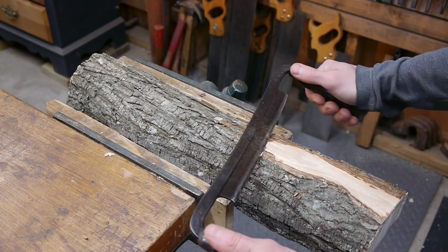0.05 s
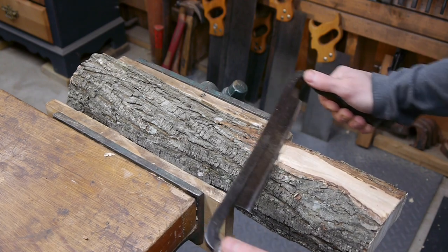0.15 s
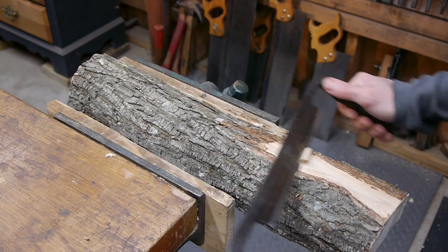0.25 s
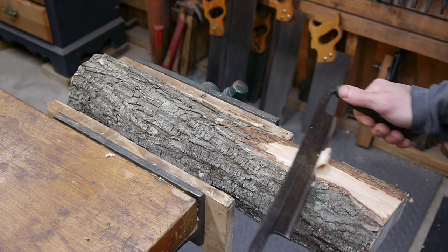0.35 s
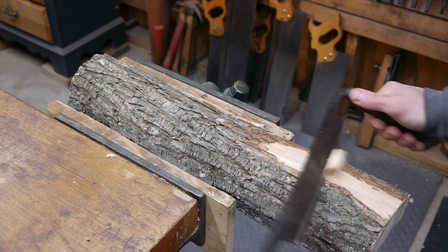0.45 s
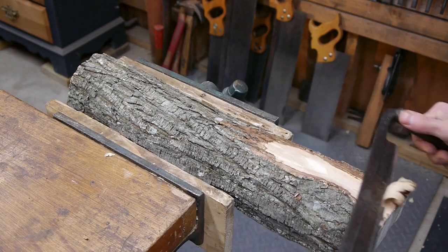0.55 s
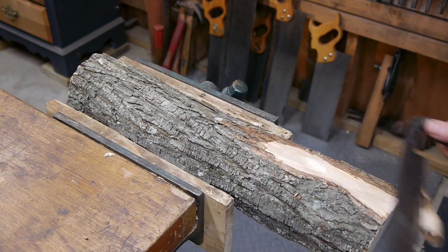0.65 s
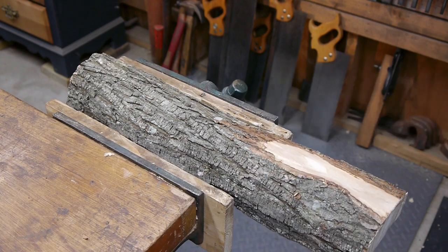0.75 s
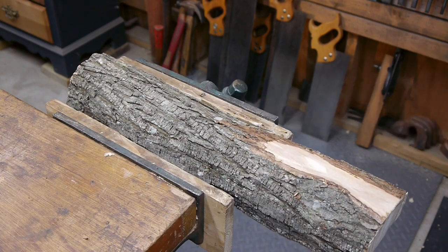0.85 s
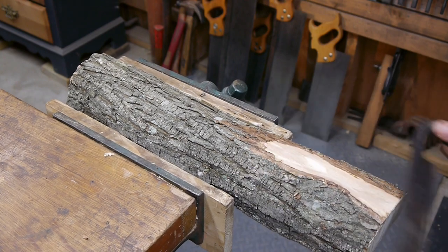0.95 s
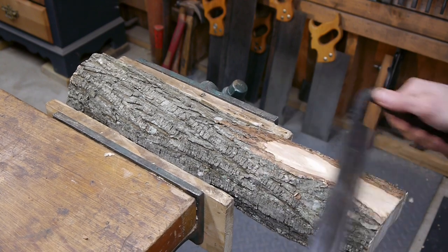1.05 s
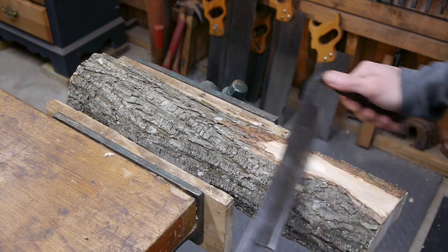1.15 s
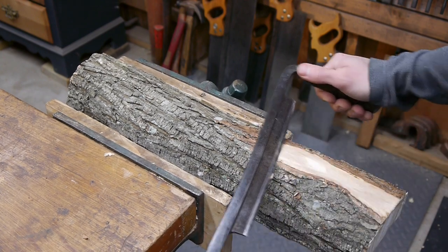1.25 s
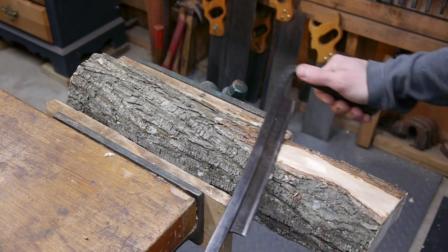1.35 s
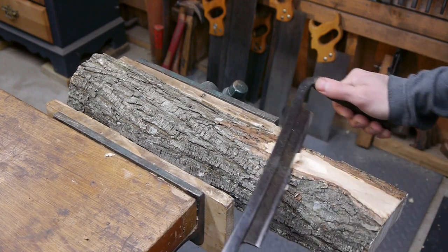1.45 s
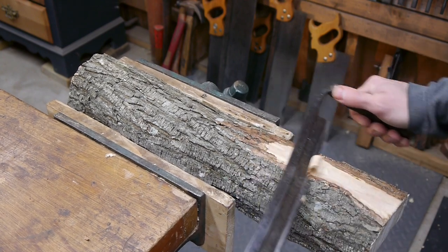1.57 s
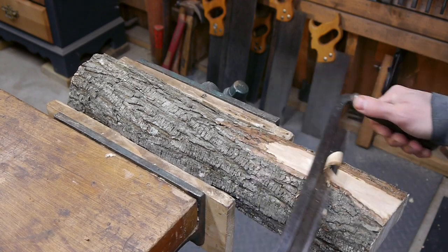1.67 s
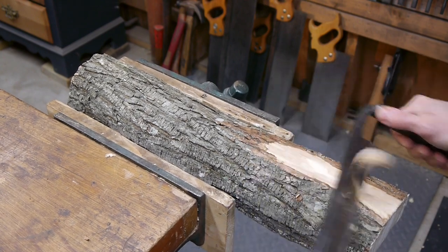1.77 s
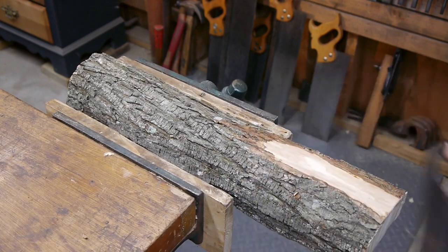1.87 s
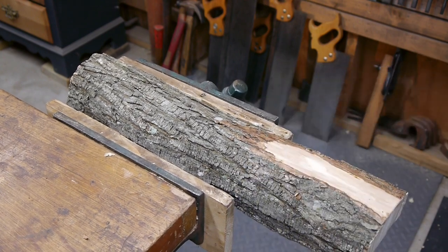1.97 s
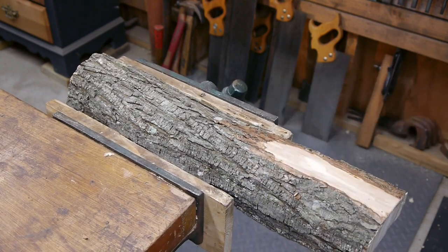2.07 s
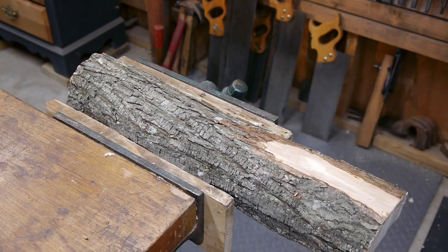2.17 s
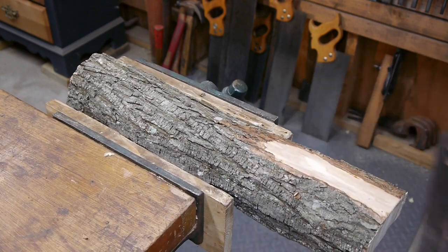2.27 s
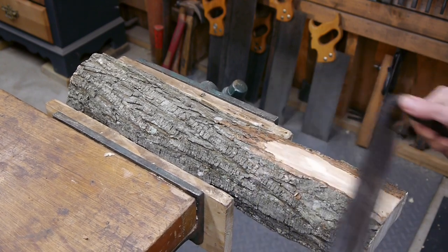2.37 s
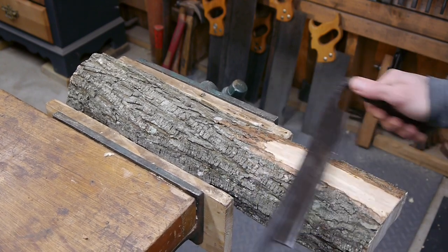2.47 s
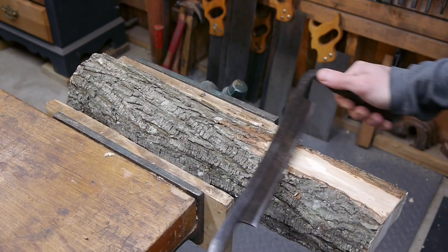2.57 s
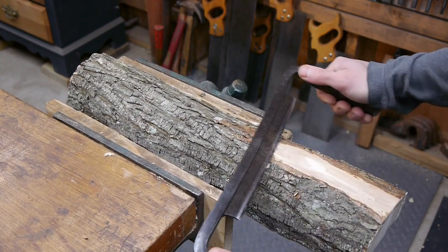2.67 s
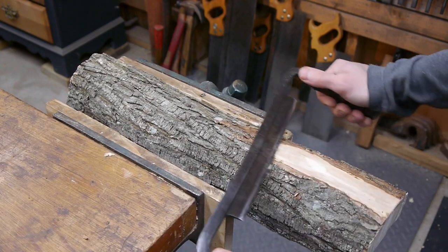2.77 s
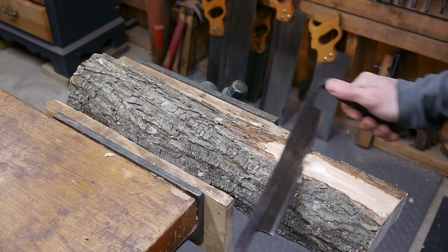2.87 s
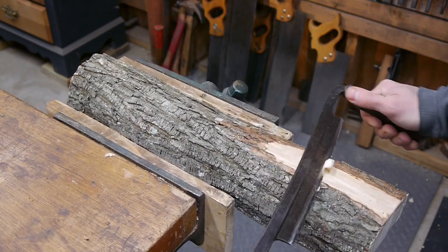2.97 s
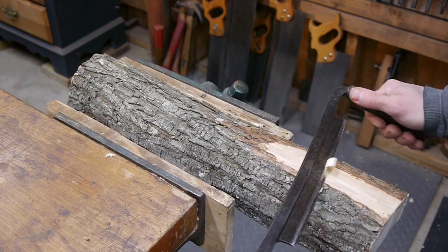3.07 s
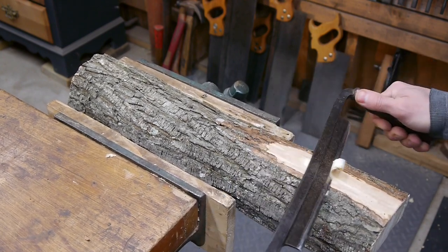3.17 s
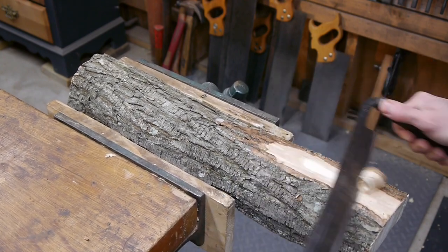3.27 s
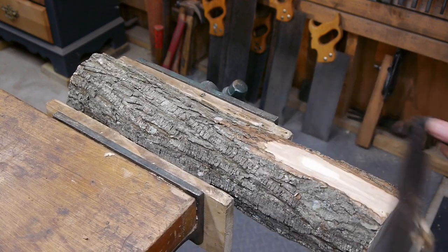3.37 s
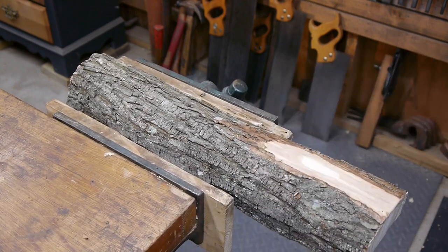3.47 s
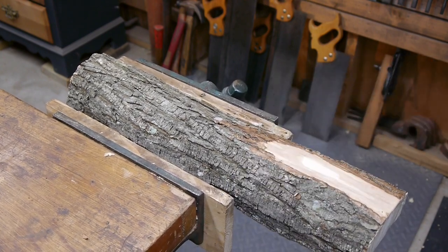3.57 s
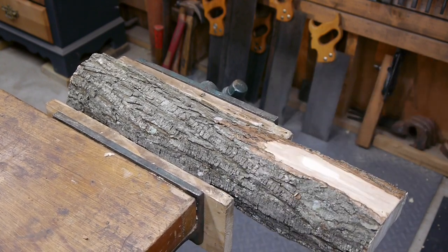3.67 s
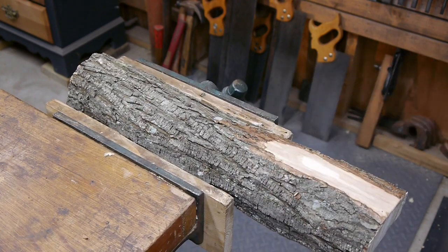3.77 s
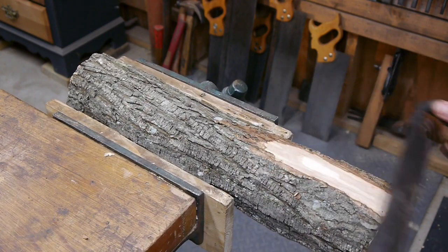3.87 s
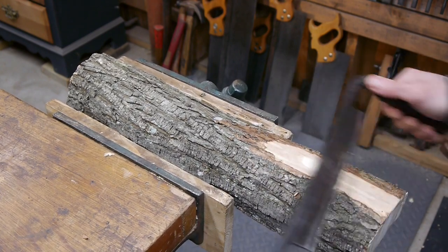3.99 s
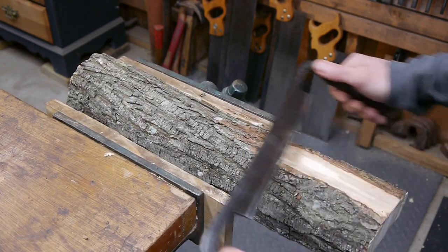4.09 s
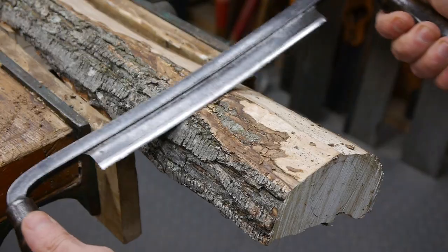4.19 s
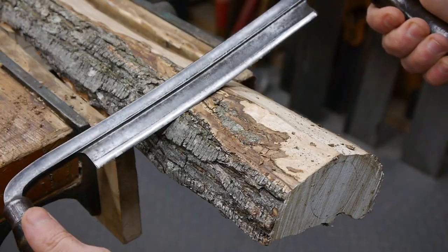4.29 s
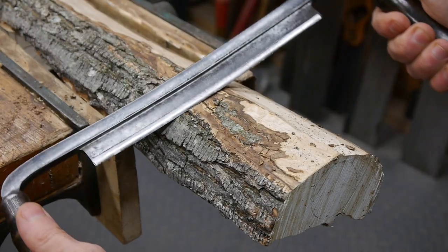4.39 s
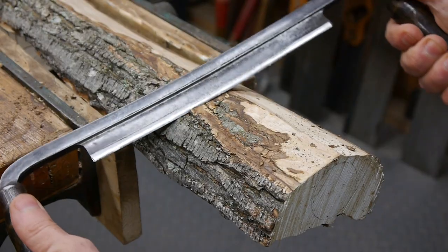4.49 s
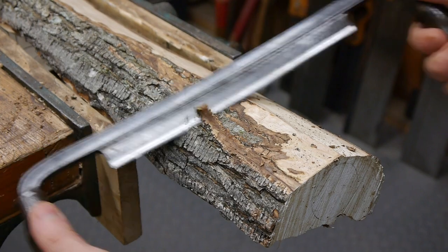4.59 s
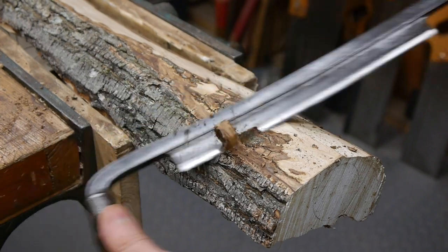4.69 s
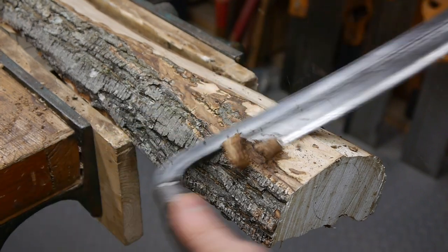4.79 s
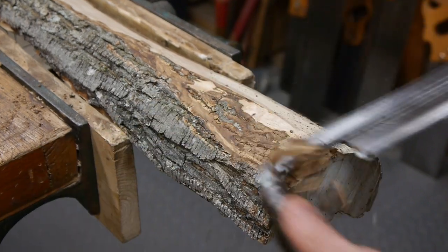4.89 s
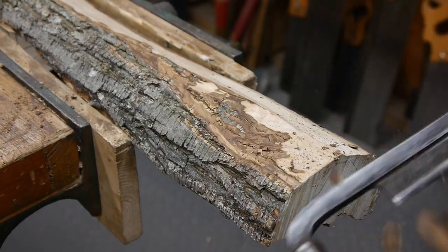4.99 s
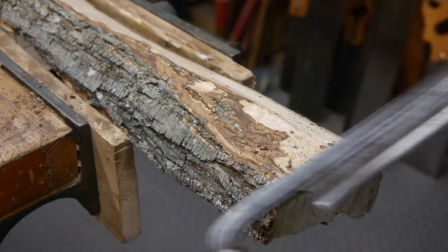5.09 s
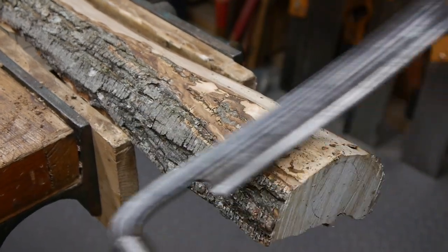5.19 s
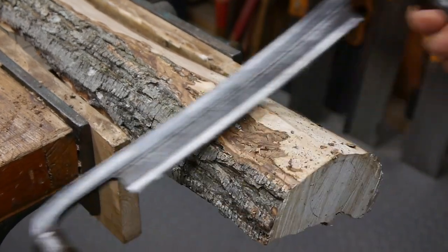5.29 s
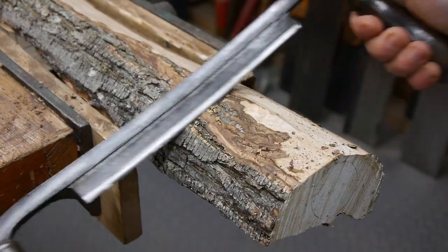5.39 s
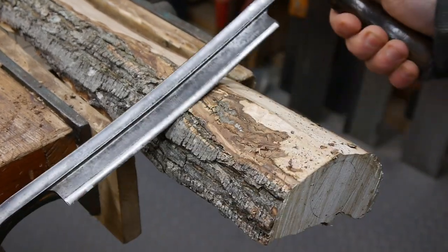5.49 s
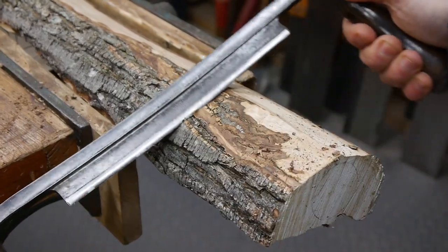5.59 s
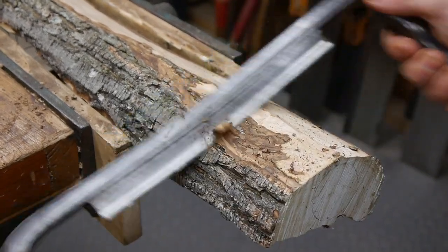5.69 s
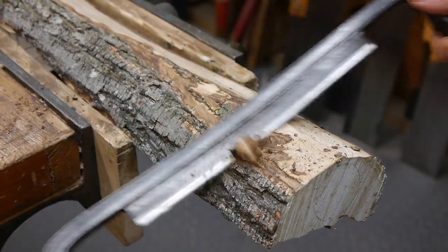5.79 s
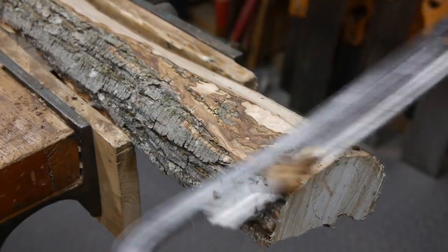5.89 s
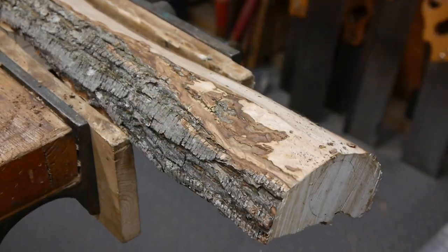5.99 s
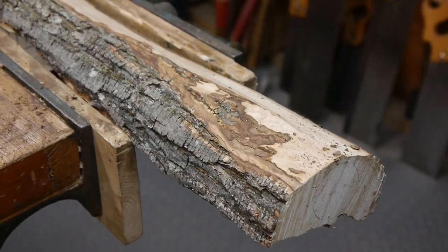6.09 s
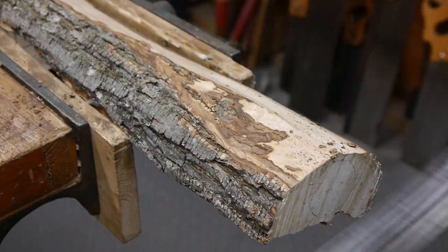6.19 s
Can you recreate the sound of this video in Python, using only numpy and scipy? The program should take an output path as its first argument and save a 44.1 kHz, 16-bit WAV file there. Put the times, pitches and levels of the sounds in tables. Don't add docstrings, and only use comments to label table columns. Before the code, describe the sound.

Five short, gritty scrapes of a steel blade through bark and wood, the last two closer and louder, with crackling fibres and wooden knocks.

```python
import sys
import numpy as np
from scipy import signal
from scipy.fft import rfft, irfft, next_fast_len
from scipy.io import wavfile
from scipy.ndimage import uniform_filter1d, map_coordinates

SR = 44100
rng = np.random.default_rng(int(sys.argv[2]) if len(sys.argv) > 2 else 0)


def field_ratio(decibels):
    return 10 ** (np.asarray(decibels, dtype=float) / 20)


def file_out(sig):
    cols = np.atleast_2d(sig).T
    lim = np.clip(cols, -1, 1)
    pcm = np.round(lim * 32767).astype(np.int16)
    wavfile.write(sys.argv[1], SR, pcm)


N = 275625
MOVE_S = 4.2


def unit(x):
    return x / np.sqrt(np.mean(x ** 2) + 1e-20)


def along(points, hz):
    f, v = np.transpose(points)
    return np.interp(np.log(hz + 1), np.log(f + 1), v)


def filtered(x, response):
    m = next_fast_len(x.shape[-1] + 8192)
    spectrum = rfft(x, m) * response(np.fft.rfftfreq(m, 1 / SR))
    return irfft(spectrum, m)[..., :x.shape[-1]]


def modes(table):
    def response(f):
        total = 0
        for k, (hz, width, db) in enumerate(table):
            damping = 1j * f * width
            total = total + (-1) ** k * field_ratio(db) * damping / (hz * hz - f * f + damping)
        return total
    return response


def colour(points):
    return lambda f: field_ratio(along(points, f))


def wobble(rate_hz):
    knots = rng.standard_normal(int(N * rate_hz / SR) + 4)
    return map_coordinates(knots, [np.arange(N) * rate_hz / SR])


def patchy(x, depth_db, bins, frames):
    z = signal.stft(x, nperseg=1024)[2]
    field = uniform_filter1d(rng.standard_normal(z.shape), bins, 0)
    field = uniform_filter1d(field, frames, 1)
    return signal.istft(z * field_ratio(depth_db * unit(field)), nperseg=1024)[1][:N]


def stutter(rate_hz, spread_db, share):
    size_db = spread_db * np.minimum(rng.exponential(size=N), 3)
    signs = np.sign(rng.standard_normal(N))
    kicks = (rng.random(N) < rate_hz / SR) * field_ratio(size_db) * signs
    return field_ratio(1.8 * wobble(45)) * (share * unit(kicks) + rng.standard_normal(N))


def seen(x, far, near):
    closer = np.clip((np.arange(N) / SR - MOVE_S) * 50, 0, 1)
    return (1 - closer) * unit(filtered(x, far)) + closer * unit(filtered(x, near))


# frequency in Hz, level in dB per Hz.
ROOM_TONE = [(15, -30), (30, -2.5), (148, -6), (250, -3.5), (700, -5), (2030, -13.5), (7500, -16.5),
             (15700, -32)]


def hush():
    return field_ratio(-61.5) * unit(filtered(rng.standard_normal((2, N)), colour(ROOM_TONE)))


# centre in Hz, width in Hz, level in dB.
WHINE = [(5150, 83, 0)]


def whine():
    level_db = -75.5 + 4.6 * wobble(4.57)
    return field_ratio(level_db) * unit(filtered(rng.standard_normal(N), modes(WHINE)))


# start in seconds, pressure in dB, speed in dB, t60 in seconds.
TOUCHES = [(0, -50.5, -61, 0.13), (.099, -37, -68, 0.3), (1.195, -51, -41, 0.28), (1.358, -42, -57.5, 0.62),
           (2.294, -44.5, -43, 0.45), (2.758, -39.5, -59, 0.36), (2.876, -52.5, -38, 0.093),
           (3.097, -34.5, -51, 0.29), (3.605, -33.5, -49, 0.29), (3.856, -59, -38.5, 0.23),
           (4.347, -38, -60, 0.28), (5.448, -34, -45, 0.32), (5.497, -29, -36.5, 0.18)]


def touches(t):
    drive = np.zeros((2, len(t)))
    for s, *level_db, t60_s in TOUCHES:
        fading_db = np.array(level_db)[:, None] - 60 * abs(t - s) / t60_s
        drive += (t >= s) * field_ratio(fading_db) ** 2
    return drive


# time in seconds, pressure into the wood in dB, speed through fibres in dB.
PULLS_FAR = [
    [(.2, -60, -56.5), (.269, -43, -42.5), (.43, -40.5, -44.5), (.541, -32, -49), (.571, -33.5, -24),
     (.669, -38, -39), (.733, -41.5, -44), (.81, -35, -53.5), (.96, -54, -70)],
    [(1.45, -57.5, -61), (1.531, -43.5, -47), (1.607, -42.5, -50.5), (1.697, -29, -32.5),
     (1.803, -36.5, -44.5), (1.879, -28.5, -31.5), (1.941, -33.5, -35.5), (1.995, -29.5, -50.5),
     (2.23, -56, -68)],
    [(2.9, -52.5, -47), (3.044, -44, -46), (3.09, -41, -57.5), (3.27, -36.5, -44.5), (3.336, -31, -30),
     (3.394, -25.5, -36), (3.466, -34.5, -29.5), (3.56, -33.5, -80), (3.79, -57.5, -81)],
]
# time in seconds, pressure into the wood in dB, speed through fibres in dB.
PULLS_NEAR = [
    [(4.631, -49, -60), (4.697, -31, -38), (4.769, -20, -24), (4.835, -26.5, -31), (4.943, -24.5, -27),
     (4.985, -31.5, -41.5), (5.121, -47.5, -61), (5.227, -48, -78), (5.3, -81, -75)],
    [(5.668, -49.5, -58.5), (5.728, -32, -36), (5.826, -18, -29), (5.876, -25.5, -42), (5.964, -20, -26.5),
     (6.056, -34.5, -50.5), (6.11, -35.5, -41), (6.21, -38.5, -65), (6.25, -39, -58)],
]


def pulls(t):
    lift_s, off_db = 0.15, -100
    drive = np.zeros((2, len(t)))
    for rows in PULLS_FAR + PULLS_NEAR:
        s, *columns = np.transpose(rows)
        s = np.r_[s[0] - lift_s, s, s[-1] + lift_s]
        level_db = [np.interp(t, s, np.r_[off_db, c, off_db]) for c in columns]
        drive += field_ratio(np.array(level_db)) ** 2
    return drive


# middle in seconds, pressure in dB, speed in dB, 10 dB fall in seconds.
BRUSHES = [(2.4, -63, -61, 0.15), (2.53, -60.5, -53, -0.06), (2.7, -64, -62, -1.1), (4.04, -60, -55, 0.08),
           (4.14, -68, -58, 0), (4.27, -60, -63, 0.1), (4.52, -56.5, -56, -0.05),
           (5.361, -47.5, -57.5, 0.29), (5.57, -48.5, -46.5, 0.1)]


def brushes(t):
    drive = np.zeros((2, len(t)))
    for s, *level_db, fall_s in BRUSHES:
        drive += field_ratio(np.array(level_db)[:, None] - 10 * ((t - s) / fall_s) ** 2) ** 2
    return drive


LEAN_DB = [-1, 2.5, 0.5, 2.5, -3]


def controls():
    t = np.arange(0, N, 22) / SR
    handling = field_ratio(np.array([-68, -65.5]))[:, None] ** 2
    drive = handling + touches(t) + pulls(t) + brushes(t)
    fine = lambda c: np.interp(np.arange(N) / SR, t, c)
    pressure_db, speed_db = map(fine, 10 * np.log10(drive))
    starts = [rows[0][0] for rows in PULLS_FAR + PULLS_NEAR]
    pull = np.maximum(np.searchsorted(starts, t) - 1, 0)
    lean_db = fine(np.array(LEAN_DB)[pull])
    bench_db = -2.5 + lean_db + pressure_db - 0.01 * (pressure_db - pressure_db.mean())
    blade_db = -6.5 + 0.75 * speed_db + 0.25 * pressure_db
    return bench_db, pressure_db, blade_db, speed_db


# centre in Hz, width in Hz, level in dB.
BENCH = [(91.6, 7.5, -17.5), (157.5, 18.5, -5), (224.9, 29, -0.5), (251, 19, 2), (303, 77, -7)]


def bench_drone(force):
    return unit(filtered(force, modes(BENCH)))


# centre in Hz, width in Hz, level in dB.
LOG_FAR = [(405.8, 66, 1.5), (500.3, 28, 7.5), (595, 113, 4), (760, 14.4, 5.5), (783, 43, 4.5),
           (935, 56, 2.5), (1035, 42, -1.5), (1181, 97, -13), (1310, 390, -17), (1433, 880, -15.5)]
# centre in Hz, width in Hz, level in dB.
LOG_NEAR = [(358.6, 16, -0.5), (406.7, 34, 0.5), (454, 32, -2.5), (561.7, 25, -0.5), (692, 70, -6),
            (822, 26, -2), (922, 105, -9.5), (1134, 10, -3), (1280, 100, -11.5)]


def log_rasp(force):
    return seen(force, modes(LOG_FAR), modes(LOG_NEAR))


# centre in Hz, width in Hz, level in dB.
BLADE_FAR = [(1830, 60, -5), (2005, 24, 5), (2420, 50, -2), (2810, 40, -10), (3450, 60, -6), (4190, 80, 0),
             (5300, 120, -7), (6700, 150, -8)]
# centre in Hz, width in Hz, level in dB.
BLADE_NEAR = [(1600, 150, -8), (2090, 50, -8), (2440, 60, 0), (3460, 50, -11), (4200, 100, -8),
              (4780, 90, -10), (5320, 60, -10), (10200, 400, -10)]
# frequency in Hz, level in dB per Hz.
SCRAPE = [(590, -85), (1000, 8), (1730, -22), (2460, 17), (3170, -8.5), (6000, -1.5), (7800, -55),
          (13200, -120)]


def blade_song(edge, force, blade_db):
    pressed = np.clip((blade_db + 62) / 20, .25, 1.1)
    tones = seen(edge, modes(BLADE_FAR), modes(BLADE_NEAR))
    return 1.8 * pressed * tones + .55 * unit(filtered(force, colour(SCRAPE)))


# frequency in Hz, level in dB per Hz.
FIBRE_FAR = [(1500, -8), (3500, -8), (4150, -5.5), (4700, -2), (5270, -3.5), (8440, 1.5), (11300, -4.5),
             (15700, -21)]
# frequency in Hz, level in dB per Hz.
FIBRE_NEAR = [(2060, -70), (3500, -6), (4200, -3), (7030, -1), (8070, 2), (10300, 2.5), (12600, -7.5),
              (15700, -14)]


def fibre_tear():
    breaks = stutter(500, spread_db=3.6, share=.8)
    fibres = patchy(breaks, depth_db=2.5, bins=30, frames=4)
    return seen(fibres, colour(FIBRE_FAR), colour(FIBRE_NEAR))


def stroke():
    bench_db, log_db, blade_db, fibre_db = controls()
    edge = stutter(300, spread_db=3.5, share=1)
    force = patchy(edge, depth_db=3, bins=3, frames=8)
    wood = field_ratio(bench_db) * bench_drone(force) + field_ratio(log_db) * log_rasp(force)
    steel = field_ratio(blade_db - 8.5) * blade_song(edge, force, blade_db)
    return wood + steel + field_ratio(fibre_db) * fibre_tear()


# frequency in Hz, t60 in seconds.
WALLS = [(150, 0.27), (1000, 0.37), (5000, 0.45), (14000, 0.14)]


def room(x, speed=1):
    hz, t, z = signal.stft(rng.standard_normal(SR // 2), SR, nperseg=256)
    decay = field_ratio(-60 * speed * t / along(WALLS, hz)[:, None])
    tail = signal.istft(z * decay, SR, nperseg=256)[1]
    delayed = np.pad(x, (150, 0))
    return signal.fftconvolve(delayed, tail / np.linalg.norm(tail))[:N]


def scattered(x):
    z = signal.stft(x, nperseg=256)[2]
    return signal.istft(z * np.exp(2j * np.pi * rng.random(z.shape)), nperseg=256)[1][:N]


def burst(hz, octaves, t60_s, tail_db, size=SR // 4):
    t, width_hz = np.arange(size) / SR, hz * octaves
    band = modes([(hz, width_hz, 0)])
    swell = field_ratio(tail_db - 60 * t / t60_s) * (1 - np.exp(-t / 0.0016))
    rustle = swell * rng.standard_normal(size) * np.sqrt(hz / SR)
    push = filtered(rustle, band) + (t == 0)
    return filtered(push, lambda f: band(f) ** 2) * SR / (2 * np.pi * width_hz)


def breaks_at(rows, octaves, rustle_db, t60_s):
    out = np.zeros(N + SR)
    for s, db, hz in rows:
        crack = burst(hz, octaves, t60_s, rustle_db)
        out[round(s * SR):][:len(crack)] += field_ratio(db) * crack
    return out[:N]


# time in seconds, peak in dB, centre in Hz.
SNAPS = [(0.0563, -32.5, 9520), (0.0975, -19, 6100), (0.5643, -6, 5770), (0.7117, -5.5, 7400),
         (1.4066, -29, 8900), (1.68, -5, 8800), (1.7579, -13, 7200), (1.874, -6, 9500),
         (1.9076, -4.5, 7900), (3.0565, -16, 8600), (3.336, -1, 8700), (3.4523, -1.5, 7400),
         (4.6533, -27, 10800), (4.674, -17, 8550), (4.6974, -4, 11300), (4.7045, -5.5, 9800),
         (4.73, -1, 11200), (4.7536, 3.5, 11300), (4.809, 0.5, 10200), (4.882, 3.5, 10400),
         (4.9135, -2, 9500), (5.6984, -18, 10100), (5.7277, -12, 10100), (5.891, -11, 10000),
         (5.9652, -4, 8400)]


def fibre_snaps():
    return breaks_at(SNAPS, octaves=0.56, rustle_db=-7, t60_s=0.072)


# time in seconds, peak in dB, centre in Hz,
# t60 in seconds, edge scuff in dB.
KNOCKS = [(0.1, -18, 420, 0.28, -16.5), (0.261, -27.5, 800, 1, -19), (0.771, -28, 490, 0.12, -14),
          (0.777, -23.5, 228, 0.38, -15), (0.937, -33.5, 590, 0.24, -26), (1.357, -24, 384, 0.15, -18.5),
          (1.38, -29, 395, 0.28, -16), (1.985, -17.5, 272, 0.29, -10.5), (2.758, -20.5, 470, 0.18, -25),
          (2.788, -28, 390, 0.3, -23), (3.099, -25, 580, 0.38, -6.5), (3.339, -12, 778, 0.49, -34),
          (3.498, -16, 220, 0.34, -15), (4.001, -41.5, 231, 0.17, -31), (4.246, -31, 335, 0.67, -43),
          (4.343, -28, 510, 0.15, -5), (4.947, -6.5, 359, 0.34, -39), (4.988, -12, 369, 0.31, -17),
          (5.181, -27.5, 606, 0.1, -23), (5.447, -25, 525, 0.14, -36), (5.506, -5.5, 413, 0.2, -33),
          (5.54, -15, 390, 0.16, -30), (5.572, -16, 402, 0.099, -24), (5.967, -7, 395, 0.28, -33)]


def knocks():
    hits, t = np.zeros(N + SR), np.arange(SR // 3) / SR
    boom_hz = BENCH[0][0]
    boom = field_ratio(-32 - 60 * t / .5) * np.sin(2 * np.pi * boom_hz * t) * (1 - np.exp(-t / 0.0017))
    for s, db, hz, t60_s, edge_db in KNOCKS:
        log = LOG_NEAR if s > MOVE_S else LOG_FAR
        pitch = np.array(list(BENCH) + list(log))[:, :1]
        chance = rng.standard_normal((2,) + pitch.shape)
        near_db = -28 * abs(np.log2(pitch / hz))
        strength_db = np.where(pitch > 1100, min(edge_db + 2, -15), near_db) + 2.5 * chance[0]
        wander = np.cumsum(.045 * rng.standard_normal((len(pitch), len(t))), axis=1)
        drift = .4 * rng.standard_normal(pitch.shape) + wander
        decay = field_ratio(strength_db - 60 * t / t60_s * np.sqrt(pitch / hz))
        ring = decay * np.sin(2 * np.pi * pitch * (1 + 0.0218 * chance[1]) * t + drift)
        thud = ring.sum(axis=0) * (1 - np.exp(-t / .0012))
        scuff = field_ratio(edge_db + 15) * burst(1470, 1.1, 0.66 * t60_s, 0.24, size=len(t))
        blow = thud / np.abs(thud).max() + boom + scuff
        hits[round(s * SR):][:len(t)] += field_ratio(db - 3.5) * blow
    return hits[:N]


# time in seconds, peak in dB, centre in Hz.
DROPS = [(1.1937, -17, 7900), (2.2924, -17, 5930), (2.2984, -8, 8450), (2.4324, -34, 10000),
         (2.8762, -20, 9400), (3.724, -30, 9200), (3.8532, -13, 8100), (4.0023, -32, 7860),
         (4.2338, -30, 9830), (4.2662, -24.5, 9900), (5.355, -23, 7740), (5.4005, -23, 10000),
         (5.445, -14, 7100), (5.497, -30, 9700), (6.2153, -24, 9000)]


def shavings():
    return breaks_at(DROPS, octaves=0.58, rustle_db=-8, t60_s=0.11)


# time in seconds, peak in dB, centre in Hz.
CHIPS = [(3.0974, -23.5, 3050), (4.312, -25.5, 4160), (4.3466, -9.5, 3300), (4.5146, -28.5, 4800)]


def bark_pieces():
    return breaks_at(CHIPS, octaves=1.75, rustle_db=.3, t60_s=0.22)


# start in seconds, frequency in Hz,
# level in dB, t60 in seconds.
SINGS = [(3.57, 2850, -54, .2), (3.605, 2800, -48, .12), (3.605, 5250, -49, .25), (4.99, 5200, -50, .3),
         (5.017, 5170, -34, .2)]


def squeaks():
    t, out = np.arange(N) / SR, np.zeros(N)
    flutter, waver = field_ratio(2.5 * wobble(120)), 1.5 * wobble(200)
    for s, hz, db, t60_s in SINGS:
        fade = np.clip((t - s) / 0.0013, 0, 1) * field_ratio(-60 * abs(t - s) / t60_s)
        out += field_ratio(db) * fade * flutter * np.sin(2 * np.pi * hz * t + waver)
    return out


# time in seconds, peak in dB, centre in Hz.
BREAK = [(4.348, -4, 4500), (4.811, 0, 9000), (4.857, -4, 13500), (4.947, 12.5, 10000), (5.053, -17, 10000)]


def dry_cracks():
    return breaks_at(BREAK, octaves=.85, rustle_db=-18, t60_s=.05)


# frequency in Hz, level in dB.
MIC = [(20, -37), (70, 2), (130, 0), (11000, -1.5), (13000, -3.5), (16000, -6.5)]
# frequency in Hz, level in dB relative to the centre.
WIDTH = [(25, -12), (60, -24), (200, -35), (500, -14), (1000, -1), (2000, 0), (8000, -5), (14000, 11.5)]


def scene():
    hits = fibre_snaps() + knocks() + shavings() + bark_pieces() + dry_cracks()
    direct = stroke() + hits + squeaks()
    answer = field_ratio(-11.5) * room(direct) + field_ratio(-31.5) * room(hits)
    near = filtered(direct + answer, colour(MIC))
    air = hush()
    mid = near + air[0] + whine()
    reflections = 0.21 * room(near, speed=3.1) + 0.33 * scattered(near)
    side = filtered(reflections + air[1] + 0.033 * mid, colour(WIDTH))
    return np.array([mid + side, mid - side])


def band_limit(x):
    return signal.sosfilt(signal.butter(12, 15870, fs=SR, output="sos"), x)


def record(dry):
    return band_limit(dry)


dry = scene()
out = record(dry)
file_out(out)
```